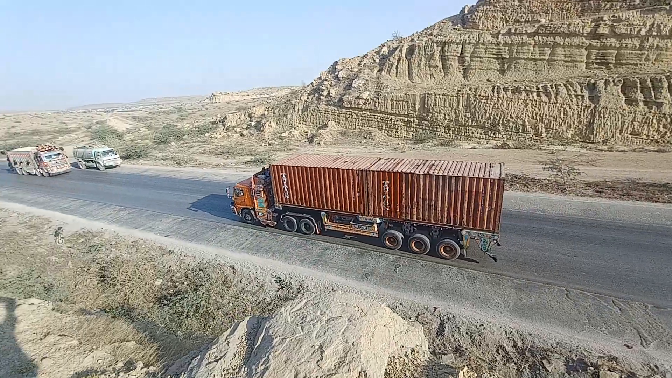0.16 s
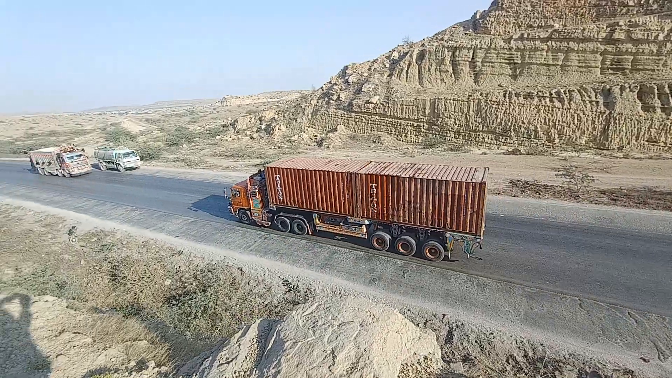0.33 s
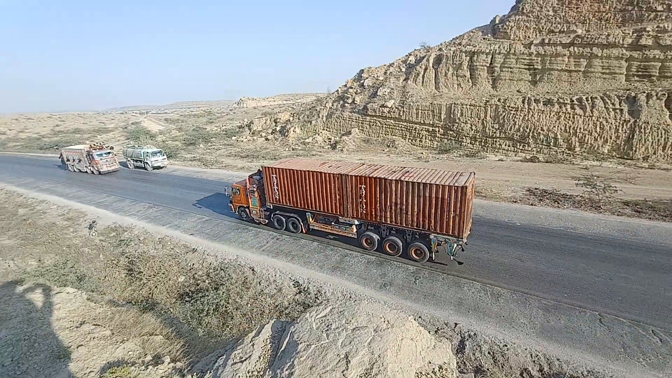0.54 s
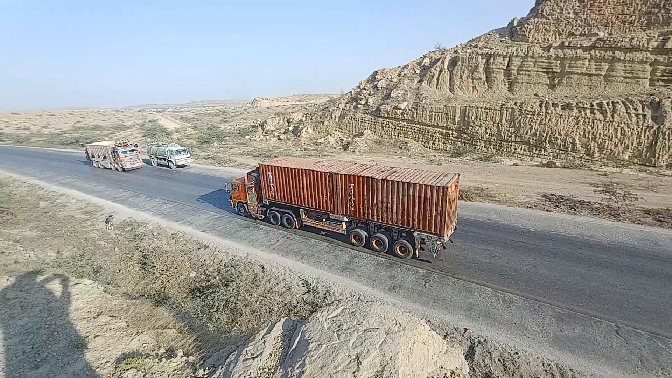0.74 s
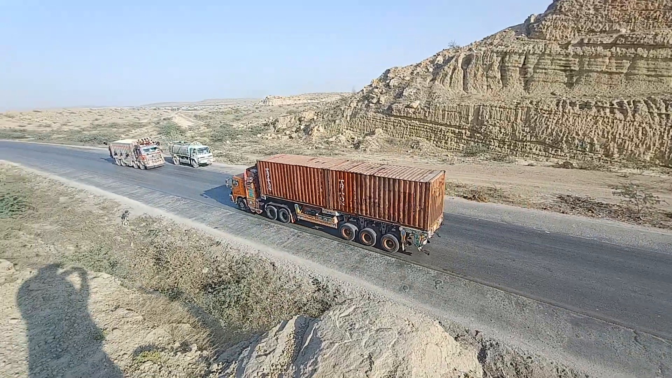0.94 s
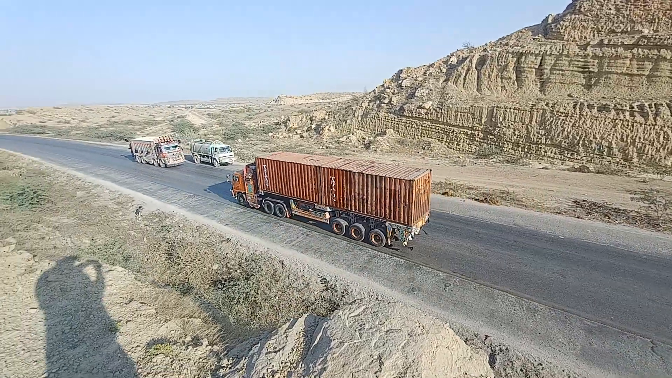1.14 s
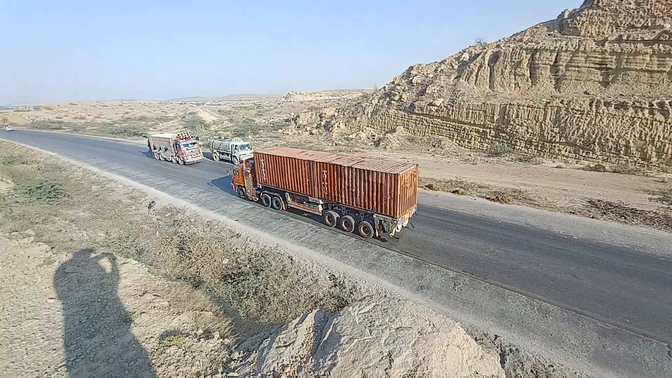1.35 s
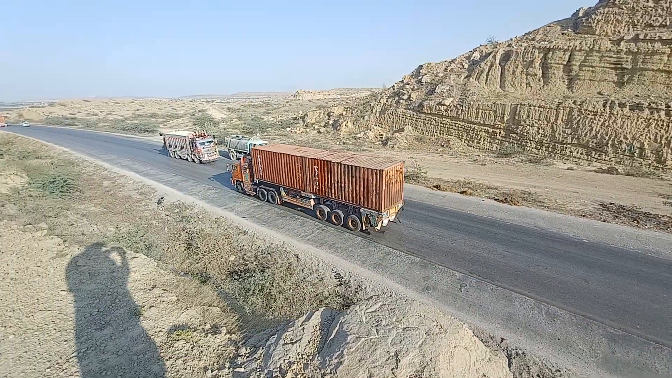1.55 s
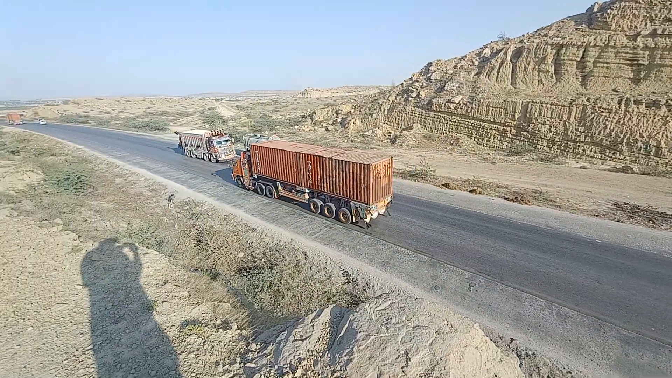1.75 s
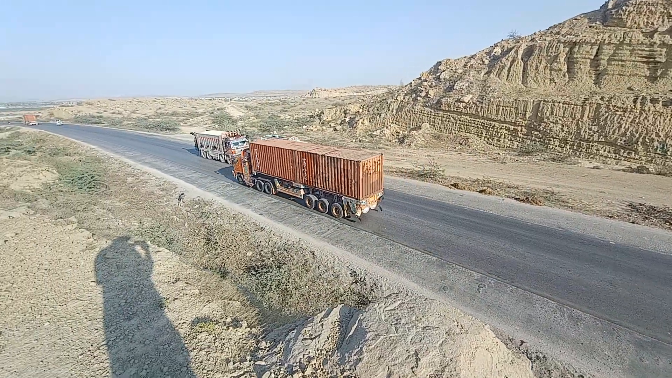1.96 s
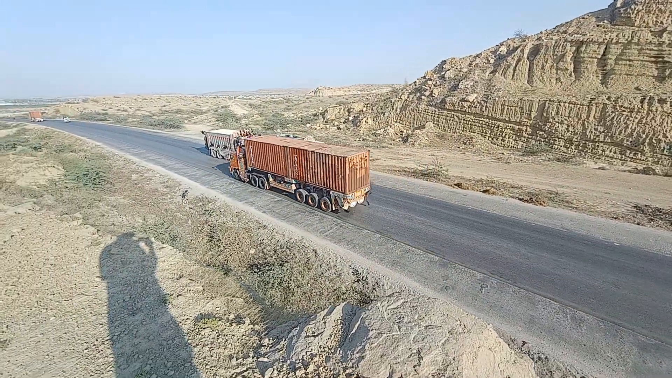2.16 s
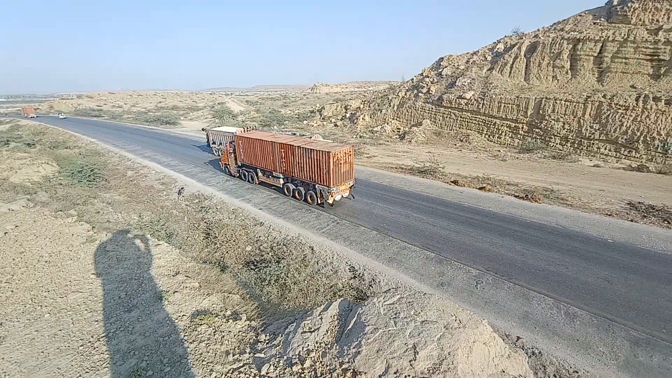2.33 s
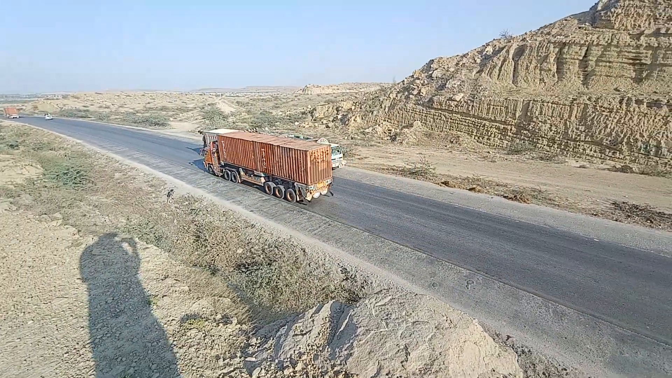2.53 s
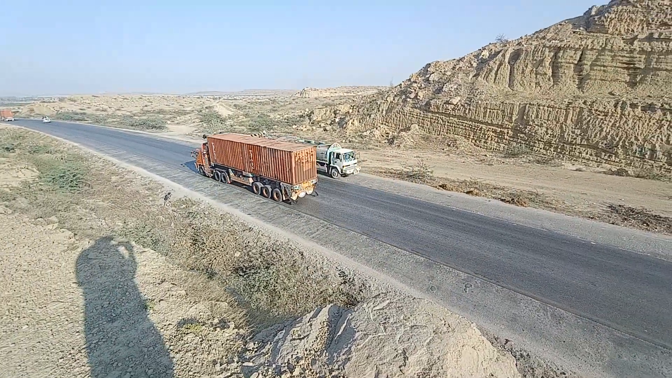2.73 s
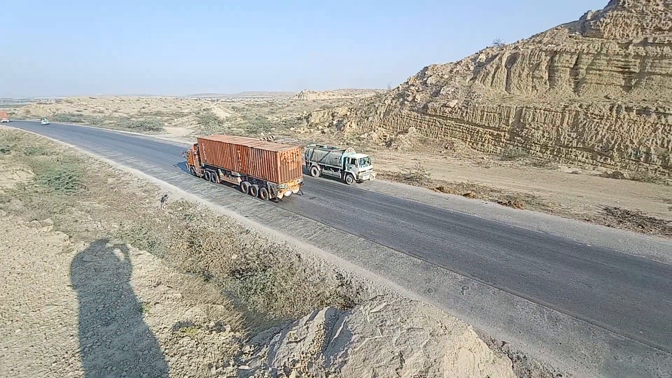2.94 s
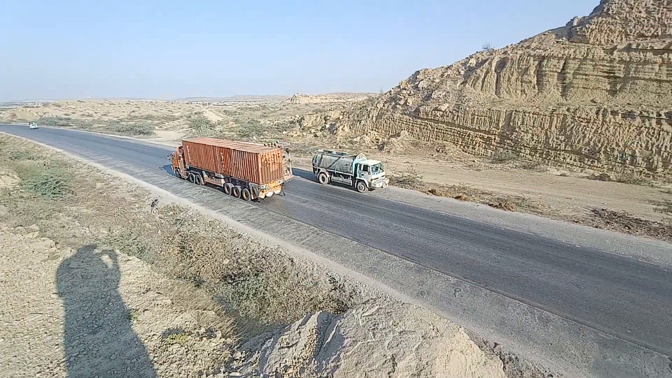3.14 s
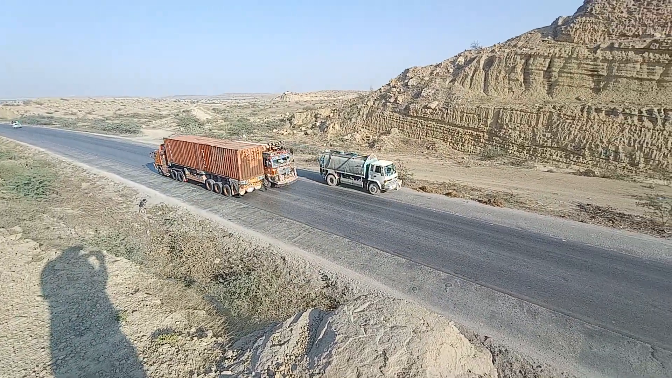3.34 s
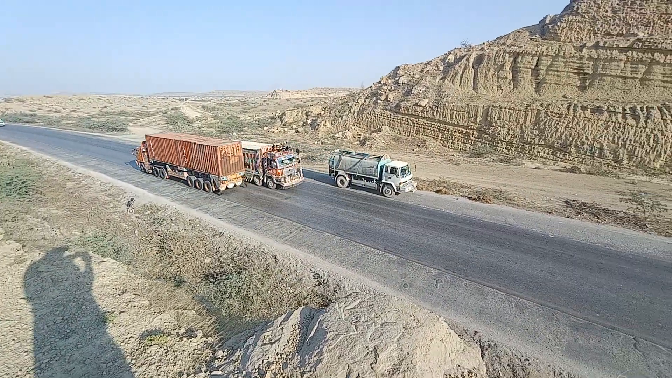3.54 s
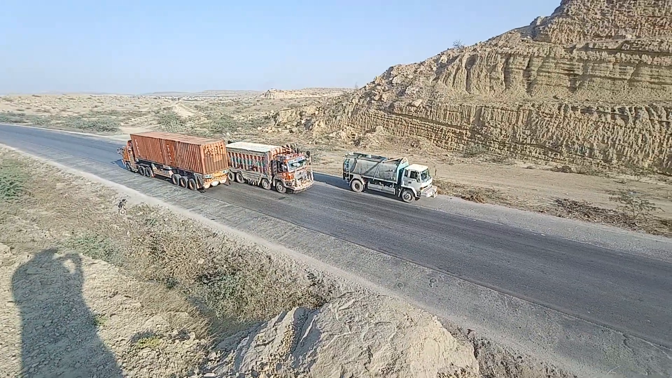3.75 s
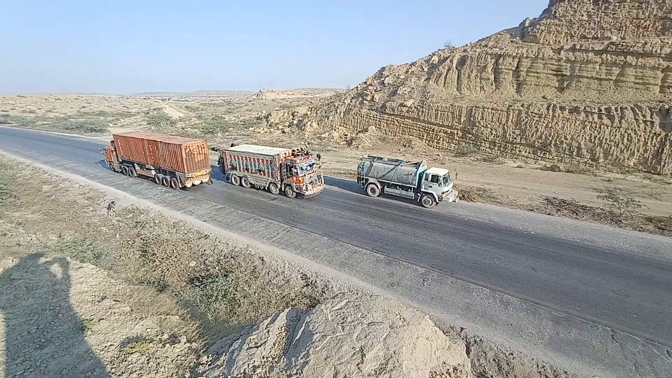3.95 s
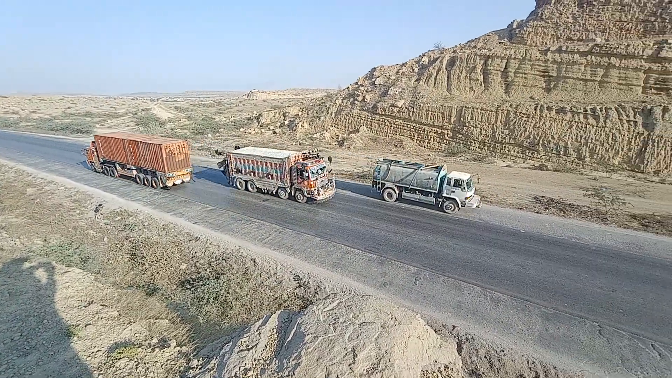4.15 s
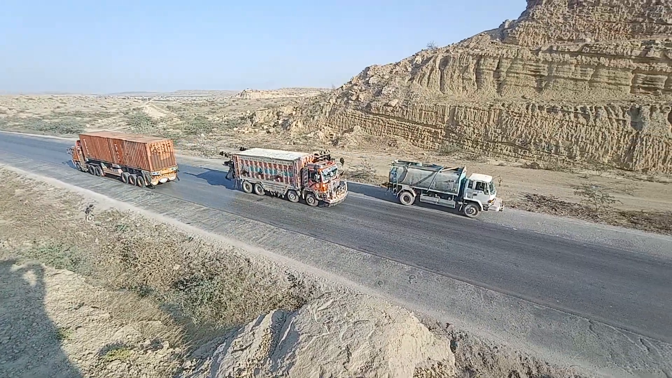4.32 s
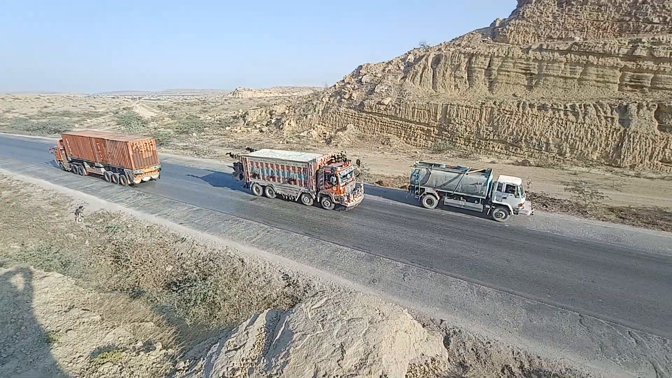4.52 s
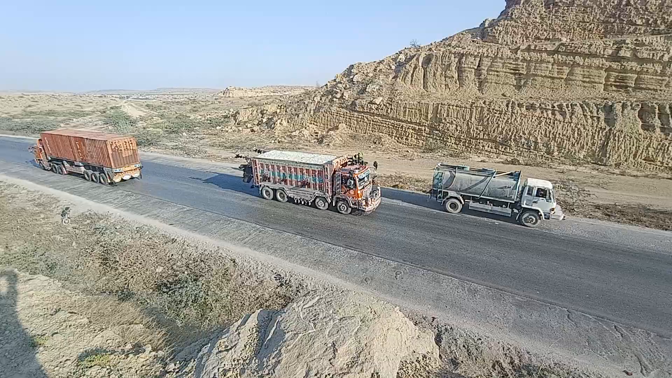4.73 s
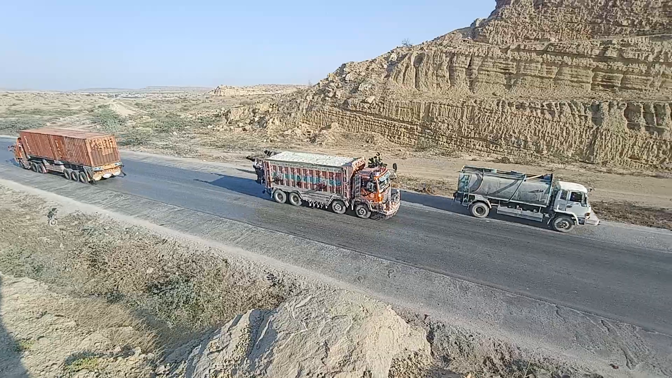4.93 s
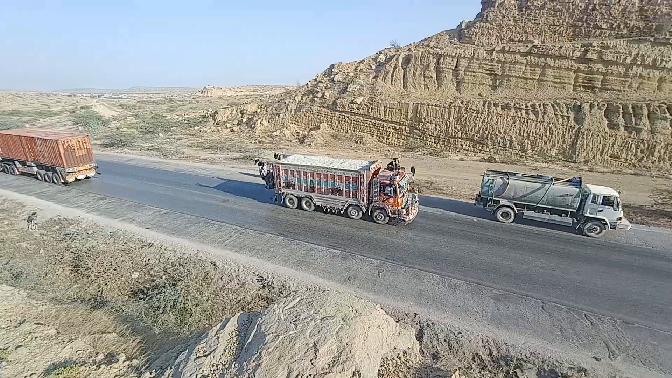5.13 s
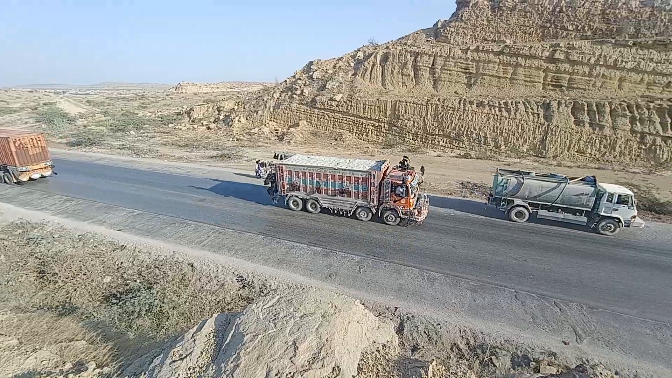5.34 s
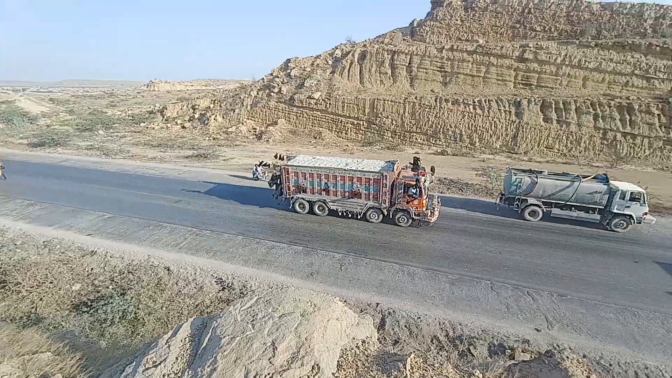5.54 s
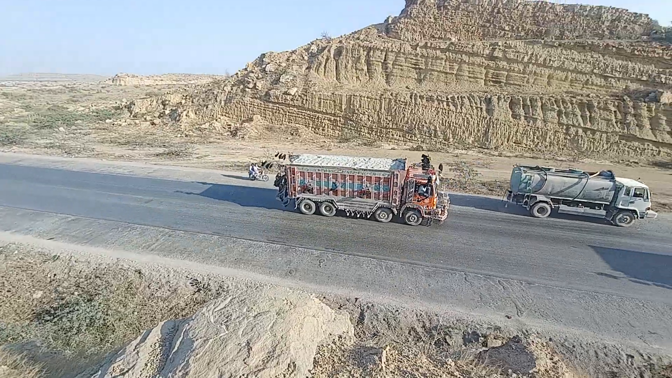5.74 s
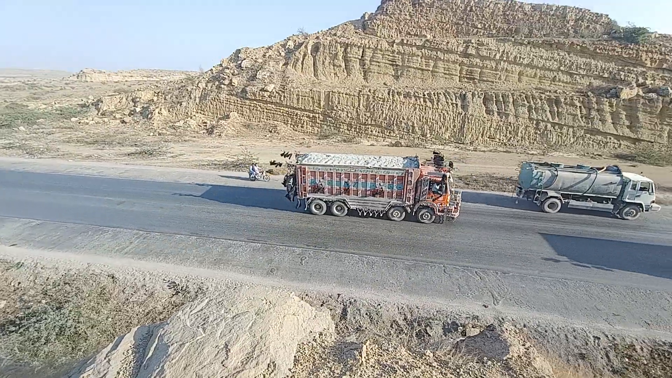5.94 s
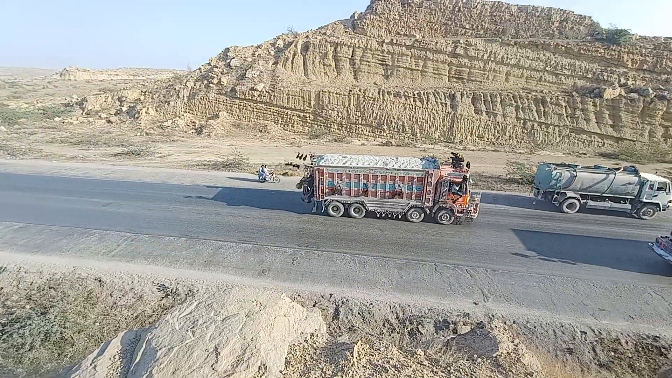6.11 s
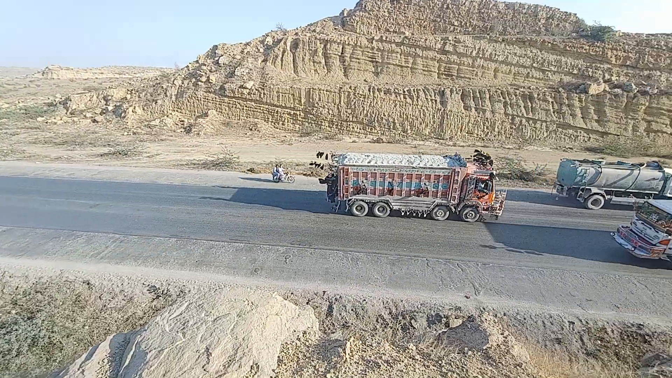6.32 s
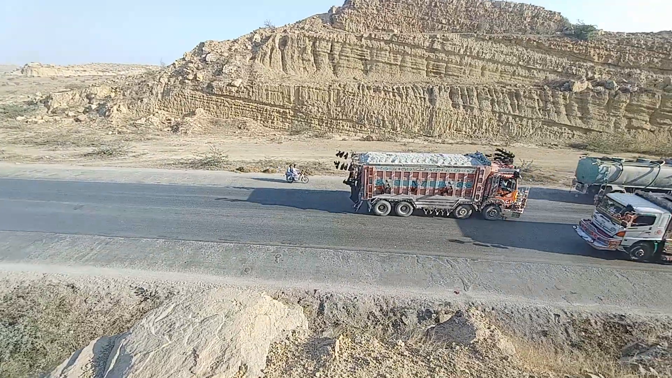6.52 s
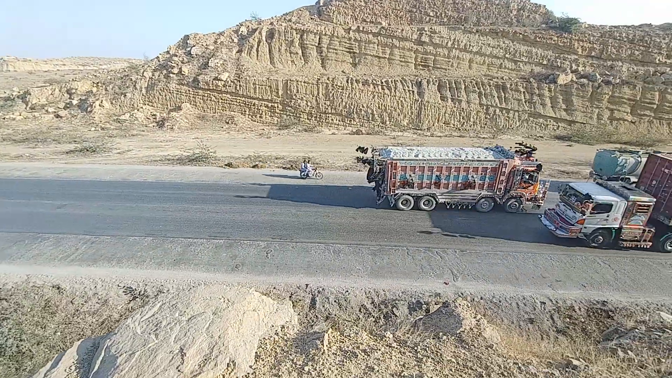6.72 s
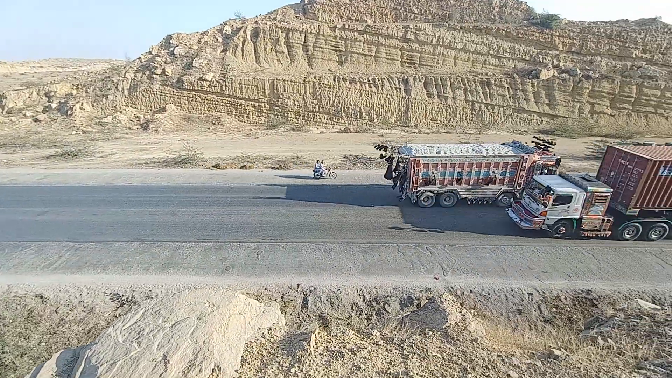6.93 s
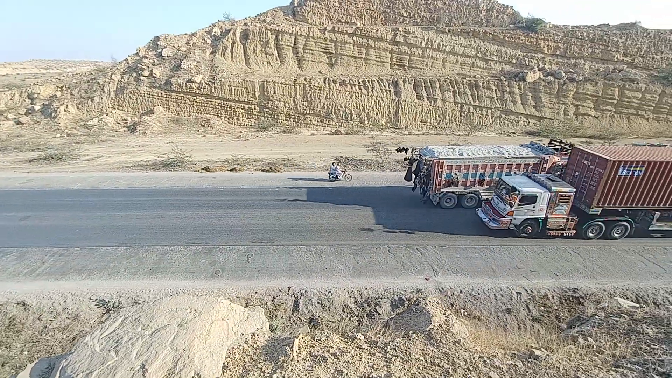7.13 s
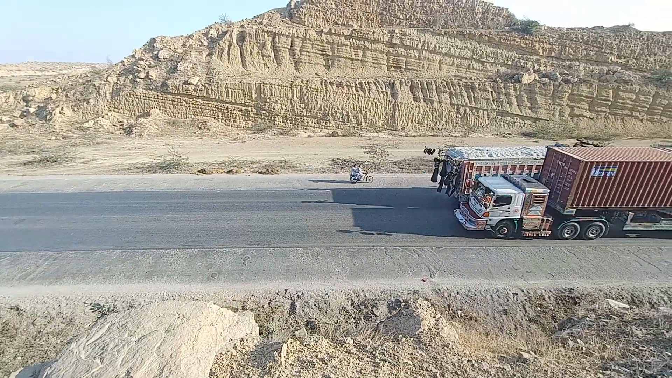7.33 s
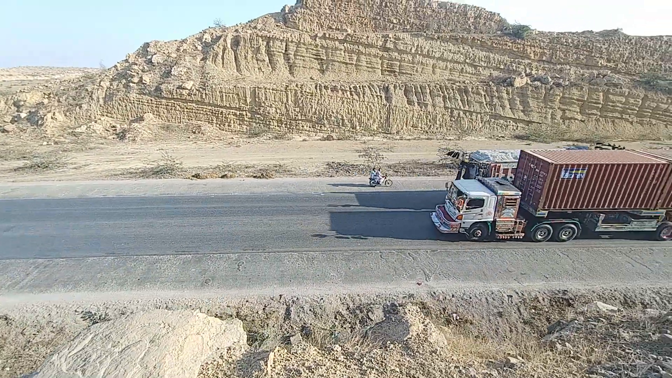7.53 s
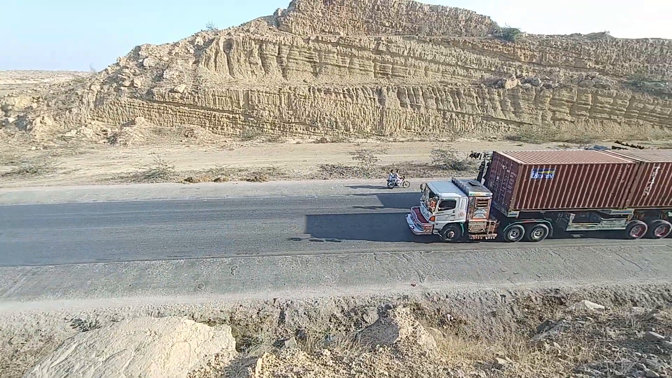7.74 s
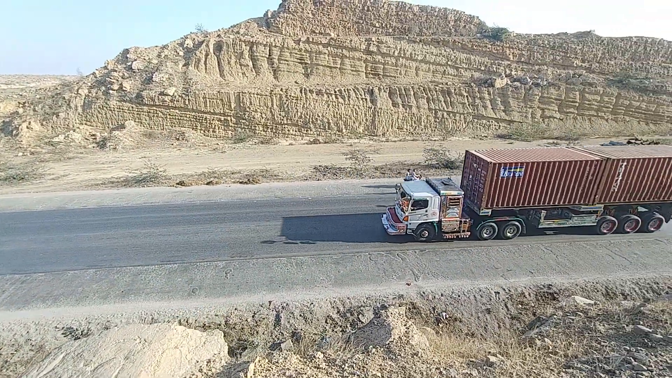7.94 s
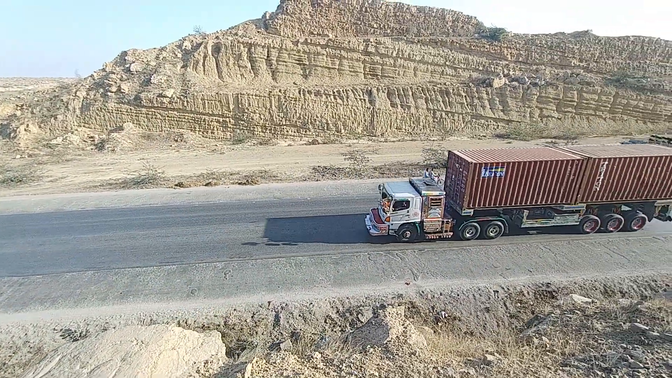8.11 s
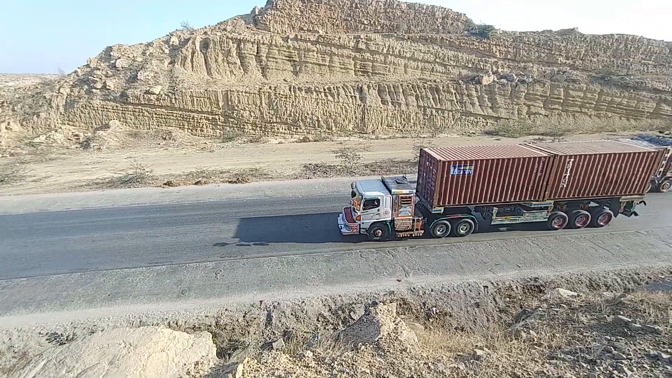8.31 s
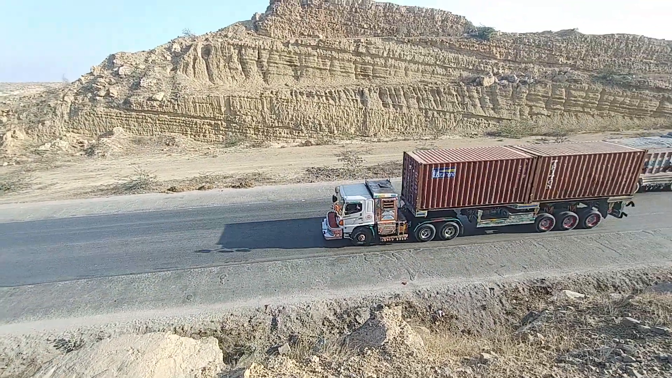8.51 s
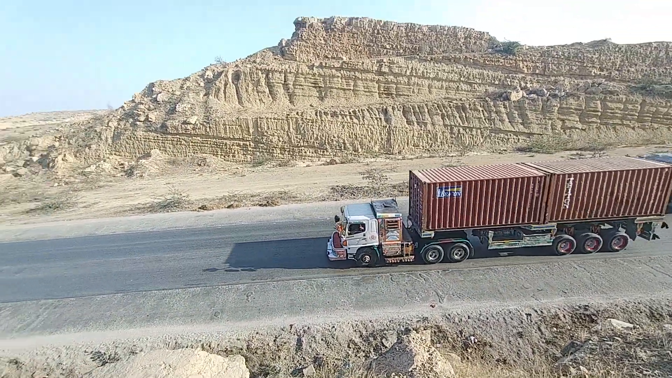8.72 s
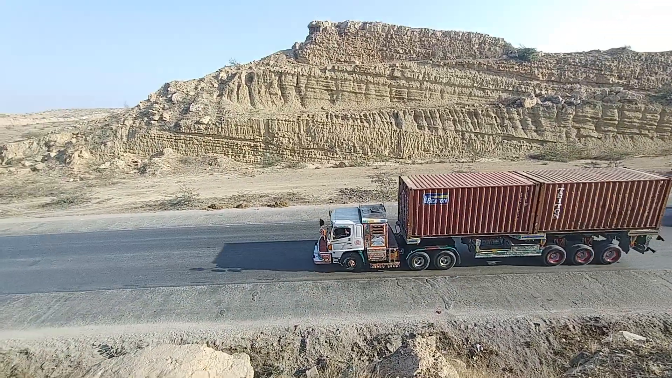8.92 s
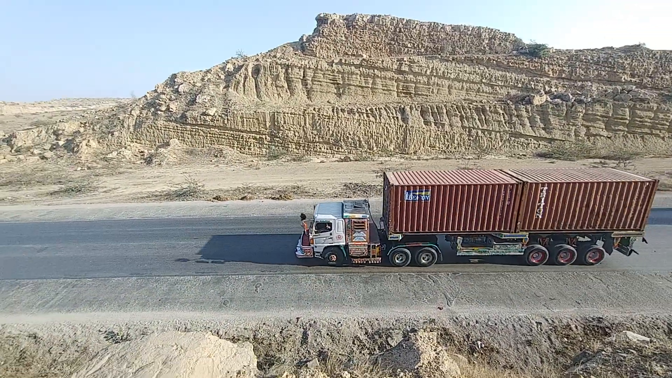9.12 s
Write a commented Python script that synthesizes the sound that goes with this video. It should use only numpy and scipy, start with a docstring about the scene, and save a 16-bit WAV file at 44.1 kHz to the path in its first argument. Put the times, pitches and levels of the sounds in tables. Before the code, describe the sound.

Low wind buffeting hits a handheld microphone above a highway, mostly on the left side. Underneath, two diesel lorries drone along with a steady rush of tyres. The rumble grows as they go by, joined by a wavering exhaust note and faint whining tones. A short spit of compressed air comes near the loudest stretch, then the traffic eases slightly and a few more gusts thump.

```python
"""Above a hill road, on a handheld camera with two microphone ports: heavy diesel lorries crawl up below.
Two engines drone and slowly gain speed over an exhaust boom, short whines, rumble and tyre roar;
an air valve spits twice. Wind buffets the left port, which is open to the road. The right port is shaded
and quieter, and the delay between the ports turns as the camera pans. Close in lie faint microphone
hiss, ticks from the camera body and the rustle of a hand."""
import sys
import numpy as np
from scipy import signal
from scipy.io import wavfile
from scipy.ndimage import uniform_filter1d

SR = 44100
rng = np.random.default_rng(int(sys.argv[2]) if len(sys.argv) > 2 else 0)


def dump(signal):
    """Clip the signal to [-1, 1] and save it as 16-bit WAV at the path in sys.argv[1]."""
    limited = np.clip(np.atleast_2d(signal).T, -1, 1)
    pcm = np.round(limited * 32767).astype(np.int16)
    wavfile.write(sys.argv[1], SR, pcm)


N = 408807
FRAME, HOP = 1024, 256  # samples
TIME, FRAME_HZ = np.arange(N) / SR, np.fft.rfftfreq(FRAME, 1 / SR)[:, None]


def first_engine():
    """A climbing diesel drones at its firing rate and the octave above."""
    # firing rate: t/s, f/Hz
    firing = [(0, 88), (2.2, 89.47), (4.2, 91.64), (5.8, 92.64), (8.0, 97.26), (9.27, 100.6)]
    # its two partials: t/s, firing level/dB, octave level/dB
    levels = [(0, -47, -47), (.3, -48, -47.5), (.52, -48, -53), (.72, -50, -41), (1.0, -48, -45),
              (1.4, -43.5, -44.5), (1.6, -42, -51.5), (1.85, -47, -50.5), (2.05, -50, -45),
              (2.25, -49, -53), (2.5, -37.5, -52), (2.76, -48.5, -46), (3.05, -39, -52), (3.76, -42, -51.5),
              (4.3, -41.5, -55.5), (5.8, -39.5, -50.5), (6.26, -44.5, -64), (6.5, -40.5, -64),
              (7.0, -43, -62), (7.27, -55, -69), (7.5, -42, -48.5), (8.0, -43.5, -54.5), (9.27, -52.5, -56)]
    hz = curves(firing, TIME)[0]
    return sum(tone(k * hz, db, waver_db=1.4, jitter_hz=.9 * k, jitter_per_s=7)
               for k, db in zip((1, 2), curves(levels, TIME)))


def second_engine():
    """Another diesel gains speed and settles; its orders, multiples of one rate, stand out at moments."""
    # engine orders: multiple, usual level/dB
    orders = [(2, -54.5), (3, -60), (4, -51.5), (6, -56), (8, -58)]
    # an order swells: start t/s, length/s, multiple, peak level/dB
    swells = [(0, 1.2, 4, -47), (0, 0.47, 6, -45), (1.0, 1, 6, -49), (2.0, 3.3, 3, -44.5),
              (3.6, 1.9, 4, -49.5), (4.103, 1.05, 6, -45.5), (3.0, 5.8, 2, -49.5), (4.6, 1.16, 3, -49),
              (5.598, 0.41, 4, -46), (6.5, .2, 4, -42), (6.7, .42, 4, -37), (7.16, .16, 4, -39),
              (7.0, 0.4, 6, -46.5), (8.2, 0.75, 4, -51), (8.66, 0.72, 6, -40.5), (2.12, .4, 8, -44),
              (8.55, .55, 8, -44.5)]
    start_hz, rise_hz, settle_s = 34.71, 3.6, 4.0
    hz = start_hz + rise_hz * (1 - np.exp(-TIME / settle_s))
    out = 0
    for k, usual_db in orders:
        swell = sum(gain_of(db) * arch(TIME, s, length) for s, length, order, db in swells if order == k)
        out += np.hypot(gain_of(usual_db), swell) * tone(k * hz, 0, jitter_hz=.45 * k, jitter_per_s=8)
    return out


def exhaust_boom():
    """A narrow, wavering exhaust note; two faint partials beat against it and make it throb."""
    # course of the boom: t/s, f/Hz, level/dB that the partials are set against
    boom = [(1.8, 268, -60), (2.25, 270, -46), (2.6, 267, -47), (2.9, 266, -48), (3.2, 265, -51),
            (3.45, 262, -47), (3.7, 268, -47), (3.85, 266, -40.5), (4.05, 273, -42), (4.25, 270, -40.5),
            (4.42, 274, -41), (4.6, 263, -44), (4.9, 270, -49), (5.88, 268, -50), (5.93, 272, -35),
            (6.1, 275, -38.5), (6.22, 266, -42), (6.34, 274, -36), (6.5, 279, -36.5), (6.64, 270, -36.5),
            (6.83, 279, -36.5), (7.02, 273, -35.5), (7.11, 272, -43), (7.21, 281, -35), (7.3, 281, -37),
            (7.37, 275, -45), (7.44, 274, -41), (7.52, 274, -45), (7.66, 274, -39.5), (7.73, 270, -49),
            (8.1, 264, -46), (8.4, 266, -54), (9.0, 275, -54), (9.15, 278, -45), (9.27, 278, -50)]
    hz, level_db = curves(boom, TIME)
    fade_in = np.clip((TIME - boom[0][0]) / 0.18, 0, 1)
    return fade_in * sum(tone(hz + apart_hz, level_db + db, jitter_hz=1.8, jitter_per_s=9)
                         for apart_hz, db in ((-11, -9), (0, -1.5), (10, -10)))


def whines():
    """Gears or tread sing in short, nearly level tones."""
    # whines: start t/s, length/s, from f/Hz, to f/Hz, peak level/dB
    notes = [(1.05, .4, 468, 473, -55), (4.2, .6, 665, 655, -49.5), (4.65, .85, 650, 632, -47.5),
             (5.45, .7, 658, 634, -47), (6.1, 1.05, 662, 644, -48), (7.3, 2.0, 750, 756, -53),
             (8.0, .9, 598, 606, -51), (7.8, .7, 955, 955, -55)]
    out = 0
    for s, length, from_hz, to_hz, db in notes:
        hz = glide(TIME, s, length, from_hz, to_hz)
        envelope = np.sqrt(arch(TIME, s, length) + 1e-9)
        out += envelope * tone(hz, db, waver_db=3, jitter_hz=2.5, jitter_per_s=4)
    return out


def road_spectrum():
    """Tyre roar and exhaust rumble as magnitude over frequency and time; nearer tyres are brighter."""
    # traffic: t/s, roar level/dB, brightness/dB, hiss/dB (both used about their means), rumble level/dB
    traffic = [(0, -46, -9.5, -35.5, -41), (.9, -46.5, -10, -35.5, -42), (1.8, -46.5, -10.5, -37.5, -40),
               (2.4, -49, -13, -37.5, -42), (2.65, -50, -12.5, -38.5, -41), (2.71, -48, -9, -31.5, -46),
               (3.1, -45.5, -10.5, -34.5, -46.5), (3.5, -43.5, -12, -36.5, -41),
               (4.1, -42, -9.5, -33.5, -39), (4.7, -40.5, -10.5, -35.5, -41), (5.3, -41.5, -8, -33, -38),
               (5.8, -40, -8.5, -36, -37), (6.5, -42, -8, -33, -36), (7.3, -43.5, -8.5, -34.5, -38),
               (7.8, -46, -6, -32.5, -40), (8.35, -45, -5.5, -32, -41.5), (8.95, -43.5, -8.5, -33, -38),
               (9.27, -47.5, -7.5, -32, -37.5)]
    # tyre roar spectrum: f/Hz, relative level/dB
    roar_colour = [(220, -25), (380, -22), (480, -3.5), (650, -3), (830, -5.5), (1130, -9), (1540, -15.5),
                   (2470, -17), (2950, -24.5), (3590, -38.5), (4000, -40), (4600, -46.5), (5500, -52.5),
                   (7000, -57.5), (8800, -63.5), (10000, -66), (15000, -74.5)]
    # exhaust rumble spectrum: f/Hz, relative level/dB
    rumble_colour = [(18, -48), (30, -37.5), (62, -23), (92, 5), (177, 2.5), (271, 7), (405, 0),
                     (500, -32.5), (650, -48.5), (1100, -120)]
    # bands that swell or dip: start t/s, length/s, from f/Hz, to f/Hz, width/Hz, peak gain/dB
    bands = [(4.5, 2.4, 1660, 1730, 54, 5.5), (1.1, 1.1, 1820, 1830, 98, 5.5), (1, 4.2, 320, 460, 38, -5),
             (2, 2.86, 1570, 1500, 280, 4.5), (5, 6.9, 500, 630, 65, -2), (5.5, 5.3, 728, 765, 29, 8),
             (2.5, 1.4, 380, 330, 34, 4.5), (2, 1.2, 530, 580, 47, 2.5), (0, 0.93, 1200, 1255, 180, -3),
             (5.04, .26, 2410, 2430, 65, 11), (5.36, .5, 2410, 2380, 60, 9), (5.16, .22, 2900, 2860, 90, 9),
             (8.95, .2, 2500, 1800, 260, 9), (8.91, .12, 5400, 4400, 300, 8),
             (8.88, .14, 1220, 1350, 150, 7), (2.68, .08, 4500, 4500, 900, 4),
             (2.82, .08, 4300, 4300, 900, 3), (8.85, .4, 1640, 1480, 80, -8), (.95, .7, 440, 400, 22, -7),
             (5.6, 2.5, 275, 275, 26, -7), (8.6, .9, 228, 228, 22, -5), (.4, 2.0, 178, 181, 20, -3),
             (3.7, 3.6, 655, 645, 30, 2.5), (4.2, 1.6, 1180, 1110, 60, 4),
             (6.2, 1.2, 1400, 1330, 110, -2.5), (5.5, .9, 2050, 1950, 120, 3.5),
             (6.5, 1.4, 1120, 880, 110, 2.5), (8, 1, 2250, 2000, 200, 2.5)]
    f, t = FRAME_HZ, frames(np.zeros(N))[1]
    roar_db, bright_db, hiss_db, rumble_db = curves(traffic, t)
    top = np.clip(np.log2((f + 1) / 2900) / 0.52, 0, 1)
    upper_mids = np.clip(np.log2((f + 1) / 800) / 1.13, 0, 1) - top
    flicker_db = wander(30)[np.minimum(t * SR, N - 1).astype(int)]
    tilt_db = upper_mids * (bright_db - bright_db.mean()) + top * (hiss_db - hiss_db.mean() + flicker_db)
    tread_hz = 556 + 9 * t  # the tread hum climbs slowly
    hum_db = 3.2 * np.exp(-((f - tread_hz) / 45) ** 2)
    roar = colour(roar_colour) * gain_of(roar_db + 2.5 + hum_db + tilt_db)
    rumble = colour(rumble_colour) * gain_of(rumble_db)
    patches = uniform_filter1d(rng.standard_normal(roar.shape), size=6, axis=0)
    ripple_db = 1.15 * unit_rms(uniform_filter1d(patches, size=30, axis=1))
    for s, length, from_hz, to_hz, width_hz, db in bands:
        band = np.exp(-((f - glide(t, s, length, from_hz, to_hz)) / width_hz) ** 2)
        ripple_db += db * arch(t, s, length) * band
    return np.hypot(roar, rumble) * gain_of(ripple_db)


def air_valve():
    """Bursts of compressed air: a swell, a quick cut-off and a short echo tail."""
    # puffs: start t/s, peak level/dB, rise time/s
    puffs = [(6.378, -45, 0.065), (8.15, -58, 0.05)]
    # escaping air spectrum: f/Hz, relative level/dB
    air_colour = [(1200, -23), (2000, 4.5), (2600, 2), (3500, -10.5), (4500, -15), (5500, -17.5),
                  (7000, -27), (9800, -31), (13500, -28.5), (15400, -26)]
    envelope = 0
    for s, db, rise_s in puffs:
        rise = np.clip((TIME - s) / rise_s, 0, 1) ** 0.84
        after = np.maximum(TIME - s - rise_s, 0)
        envelope += gain_of(db) * rise * (0.55 * np.exp(-after / 0.008) + 0.45 * np.exp(-after / 0.045))
    return envelope * noise(colour(air_colour))


def wind():
    """Wind on the port: lumpy low noise and small eddies follow the gusts; the largest eddies stand alone.
    """
    # buffeting spectrum: f/Hz, relative level/dB
    wind_colour = [(25, -14), (45, -8), (65, -3), (90, 0), (170, -1), (250, -5), (350, -11), (500, -18),
                   (900, -45), (2000, -120)]
    # gusts: middle t/s, length/s, peak level/dB
    gusts = [(0, 0.064, -27.5), (0.498, 1.8, -41.5), (2.753, 0.24, -47), (3.0, 0.18, -45),
             (3.252, 0.33, -41.5), (3.504, 0.33, -45), (3.743, 0.26, -41), (4.598, 1.8, -45),
             (6.497, 1.8, -46.5), (9.0, 0.5, -45), (9.158, 0.16, -37.5)]
    # single large eddies: t/s, peak level/dB, f/Hz
    thumps = [(.128, -28, 130), (.172, -25, 140), (.196, -26, 230), (.234, -18.5, 180), (.275, -28, 190),
              (.346, -26.5, 110), (.378, -26, 90), (.411, -27, 110), (.4592, -18.5, 180), (.5803, -24, 130),
              (.622, -24, 85), (.657, -24.5, 110), (.6991, -18.5, 130), (.83, -22, 140), (.856, -25.5, 150),
              (.8971, -20.5, 165), (.935, -28, 125), (2.886, -25, 130), (3.800, -24, 149.2),
              (8.820, -24.5, 130), (9.03, -26, 100), (9.1218, -24, 170), (9.155, -22, 95),
              (9.18, -18.5, 150), (9.2, -25, 90)]
    breeze_db, eddies_per_s, eddy_share = -46, 25, .3
    lumps = noise(colour(wind_colour)) * gain_of(3 * wander(40))
    kicks = (rng.random(N) < eddies_per_s / SR) * np.minimum(rng.exponential(1, N), 2)
    small_eddies = signal.oaconvolve(kicks, eddy(TIME[:800] - TIME[400], hz=139), "same")
    gusting = sum(gain_of(db) * arch(TIME, s - length / 2, length) ** 2 for s, length, db in gusts)
    strength = np.hypot(gain_of(breeze_db - wander(5)), gusting)
    buffeting = strength * unit_rms(unit_rms(lumps) + eddy_share * unit_rms(small_eddies))
    return buffeting + sum(gain_of(db) * eddy(TIME - s, hz) for s, db, hz in thumps)


def eddy(t, hz):
    """One push and pull of air on the port, a slow rise and a sudden drop, peak near 1."""
    phase = 2 * np.pi * hz * t
    return -np.tanh(2 * phase) * np.exp(.2 - .3 * np.minimum(phase ** 2, 300))


def microphone_hiss():
    """Each microphone's own noise, a little stronger on the left."""
    # self noise spectrum: f/Hz, relative level/dB
    hiss_colour = [(2000, -18), (4000, -3), (7000, -4.5), (9800, -4.5), (11500, 2), (12600, -4.5),
                   (13500, 2.5), (15000, -6.5)]
    return np.array([gain_of(db) * noise(colour(hiss_colour)) for db in (-88.5, -90)])


def hand_rustle():
    """A hand shifts on the camera with a thin, high rustle."""
    # hand movements: start t/s, length/s, peak level/dB
    moves = [(8.14, 0.11, -78), (8.22, 0.24, -79), (8.3, .38, -84), (8.72, .07, -86)]
    # rustle spectrum: f/Hz, relative level/dB
    rustle_colour = [(8000, -19), (10000, -8), (11500, 2.5), (12600, -3), (15000, -9)]
    envelope = np.sqrt(sum((gain_of(db) * arch(TIME, s, length)) ** 2 for s, length, db in moves))
    return noise(colour(rustle_colour)) * envelope * gain_of(1.2 * wander(25))


def body_ticks():
    """Faint ticks from the camera body reach both microphones."""
    # ticks: t/s, level/dB
    ticks = [(1.8806, -75), (1.9701, -73), (2.3274, -60), (2.9961, -70), (8.7794, -68)]
    out = np.zeros((2, N))
    decay = np.exp(-TIME[:200] / 0.0012)
    for s, db in ticks:
        snap = decay * uniform_filter1d(rng.standard_normal((2, 200)), size=2)
        out[:, round(s * SR):][:, :200] += gain_of(db) * snap
    return out


def shaded_port(direct, scattered):
    """The road at the right port: shaded, shifted in time by the pan and mixed with scattered sound."""
    # left port against right: f/Hz, level difference/dB, phase lead/rad
    ports = [(60.3, 5.5, 0.34), (142, 10.5, 0.048), (293, 14, 0.5), (606, 17.5, .06), (1090, 14, 0.0075),
             (1930, 10, 0.06), (2400, 10.5, 0.08), (2800, 16.5, 0.12), (3500, 12.5, 0.15), (4550, 7, 0.12),
             (5530, 2.5, 0.1), (8000, 3, 0.11), (13100, -2, 0.12)]
    # likeness of the ports: f/Hz, coherence (0-1)
    likeness = [(60, .88), (150, .95), (300, .98), (700, .86), (1200, .66), (2200, .55), (3500, .38),
                (8000, .4)]
    # bearing of the traffic: t/s, left port's lag/ms
    bearing = [(0, -0.15), (2, -0.14), (2.8, -0.12), (4, 0.11), (5, 0.13), (6.5, .25), (7.6, 0.21),
               (9.27, 0.096)]
    _, t, spectrum = frames(direct)
    port_hz, *columns = np.transpose(ports)
    shade_db, lead = (np.interp(np.log(FRAME_HZ + 1), np.log(port_hz), c) for c in columns)
    coherence = curves(likeness, FRAME_HZ)[0]
    lag_s = curves(bearing, t)[0] / 1000
    shift = np.exp(1j * (2 * np.pi * FRAME_HZ * lag_s - lead))
    mixed = coherence * shift * spectrum + np.sqrt(1 - coherence ** 2) * frames(scattered)[2]
    return unframe(gain_of(-shade_db) * mixed)


def tone(hz, db, jitter_hz, jitter_per_s, waver_db=1.5):
    """One partial at rms level db, wavering a little as the air path changes."""
    turns = np.cumsum(hz + jitter_hz * wander(jitter_per_s)) / SR + rng.random()
    return np.sqrt(2) * gain_of(db + waver_db * wander(9)) * np.sin(2 * np.pi * turns)


def noise(shape):
    """White noise given a magnitude over frequency and time; rms 1 for a shape of power 1."""
    return unframe(frames(rng.standard_normal(N))[2] * shape * np.sqrt(FRAME / 2))


def colour(points):
    """A spectrum as a column of gains of total power 1."""
    f, db = np.transpose(points)
    gain = gain_of(np.interp(np.log(FRAME_HZ + 1), np.log(f + 1), db))
    return gain / np.linalg.norm(gain)


def wander(per_s):
    """Random drift of rms 1, with per_s new values a second."""
    step = int(SR / per_s)
    knots = rng.standard_normal(N // step + 2)
    return unit_rms(np.interp(np.arange(N) / step, np.arange(len(knots)), knots))


def curves(rows, at):
    """A table's later columns, interpolated along its first."""
    axis, *columns = np.transpose(rows)
    return [np.interp(at, axis, c) for c in columns]


def arch(t, start, length):
    """Rises from 0 to 1 and falls back within the length."""
    return np.sin(np.pi * np.clip((t - start) / length, 0, 1))


def glide(t, start, length, from_hz, to_hz):
    return from_hz + (to_hz - from_hz) * np.clip((t - start) / length, 0, 1)


def gain_of(db):
    return 10 ** (np.asarray(db) / 20)


def unit_rms(x):
    return x / np.sqrt(np.mean(abs(x) ** 2) + 1e-20)


def frames(x):
    return signal.stft(x, SR, nperseg=FRAME, noverlap=FRAME - HOP)


def unframe(z):
    return signal.istft(z, SR, nperseg=FRAME, noverlap=FRAME - HOP)[1][..., :N]


def scene():
    """The left port takes the road and the wind openly; the right is shaded and nearer the hand."""
    road, puffs = road_spectrum(), air_valve()
    direct = noise(road) + first_engine() + second_engine() + exhaust_boom() + whines() + puffs
    right = shaded_port(direct, scattered=noise(road) + .5 * air_valve())
    out = gain_of(3) * np.array([direct + wind(), right]) + microphone_hiss()
    out[1] += hand_rustle()
    return out + body_ticks()


def record(dry):
    """The microphones' bass roll-off, then the camera's band limit."""
    low_hz, edge_hz = 47, 15480
    thin = signal.sosfiltfilt(signal.butter(2, low_hz, "high", fs=SR, output="sos"), dry)
    band_limit = signal.firwin(511, edge_hz, window=("kaiser", 9), fs=SR)
    return signal.oaconvolve(thin, band_limit[None], "same")


dry = scene()
out = record(dry)
dump(out)
```